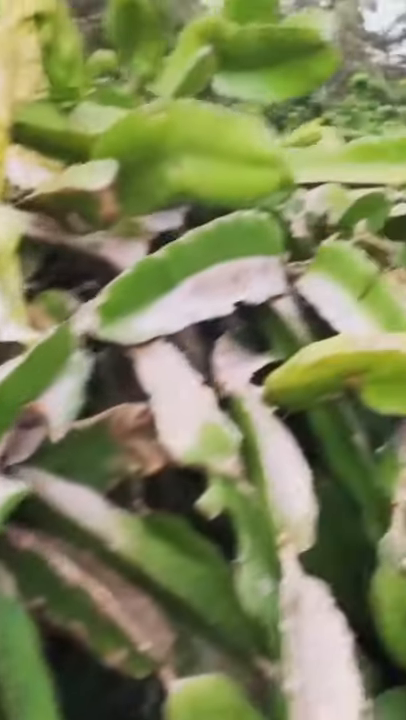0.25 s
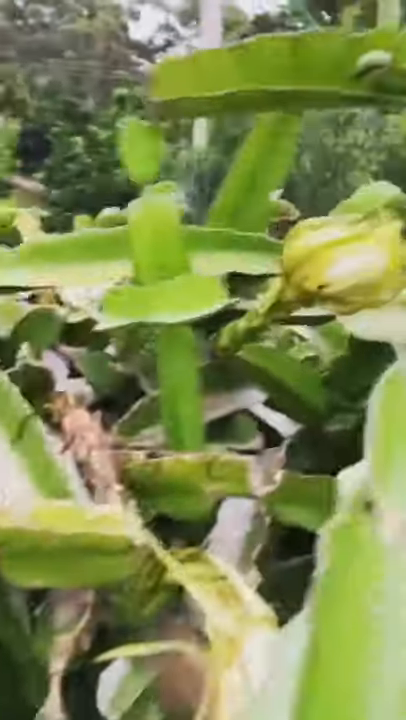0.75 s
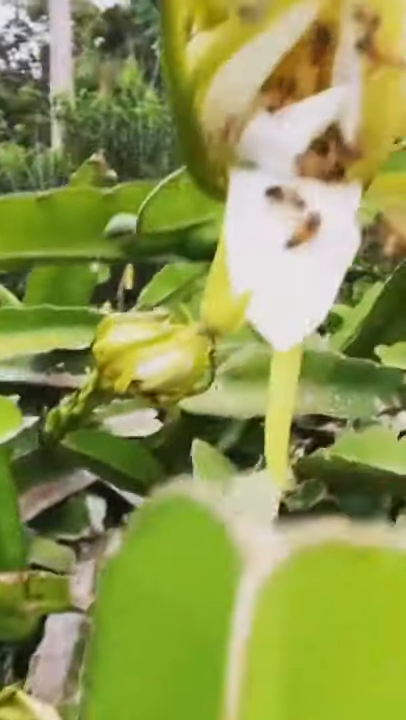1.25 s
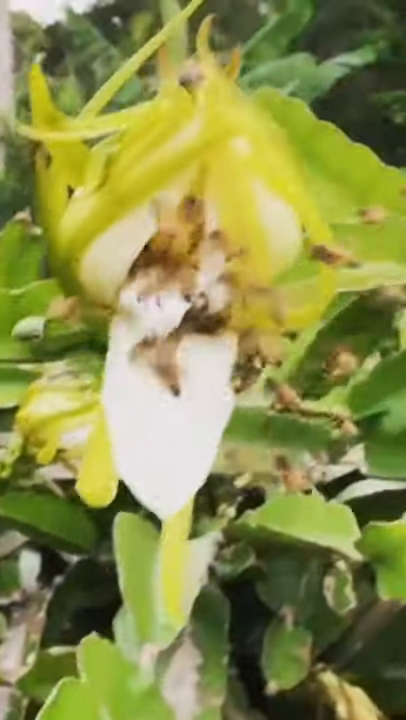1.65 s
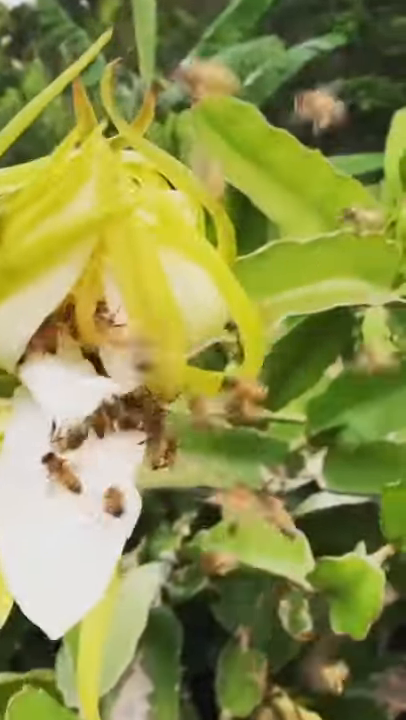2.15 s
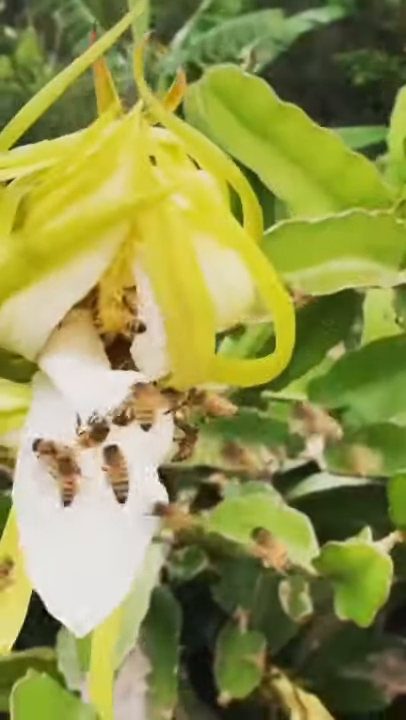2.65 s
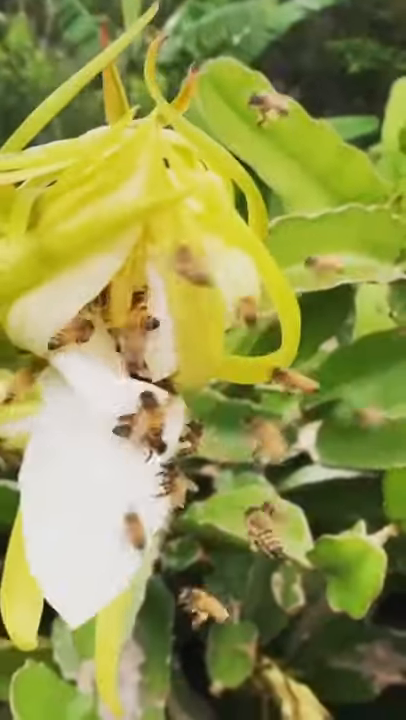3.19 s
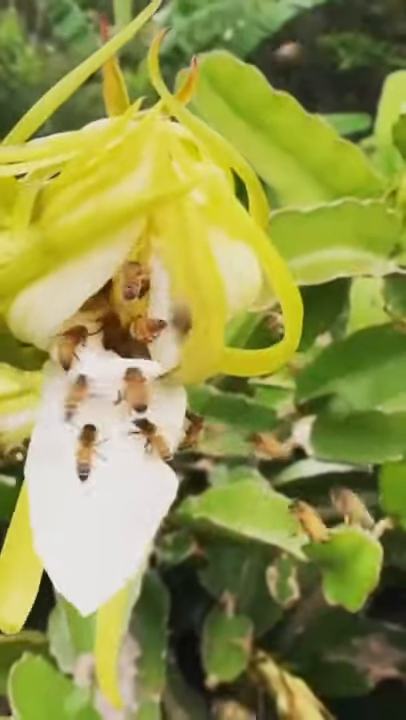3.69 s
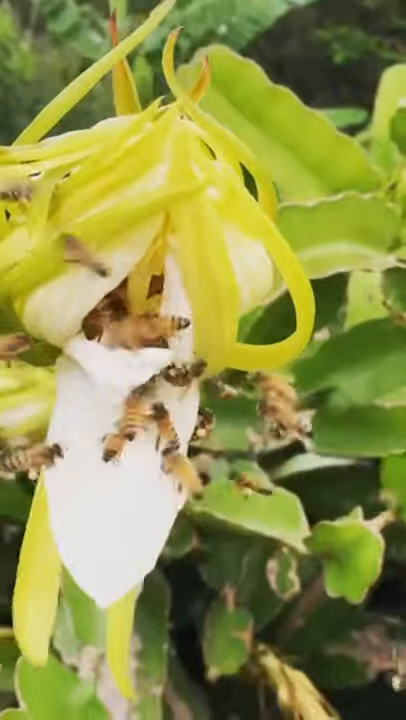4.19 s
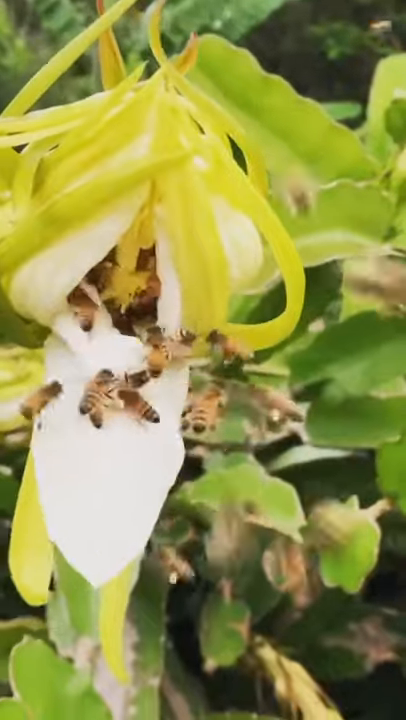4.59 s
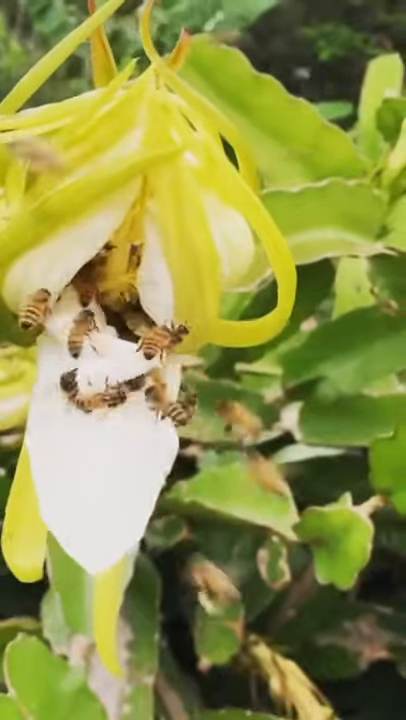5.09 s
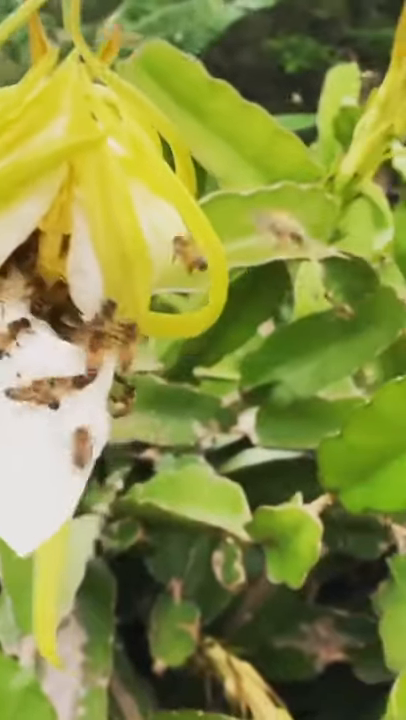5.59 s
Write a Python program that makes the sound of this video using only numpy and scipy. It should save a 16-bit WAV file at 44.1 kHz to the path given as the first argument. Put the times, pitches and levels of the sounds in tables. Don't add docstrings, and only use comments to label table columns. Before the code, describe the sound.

A close, hand-held stereo recording of honey bees around a flower outdoors. It opens with airy hiss, a thin high shimmer of far insects, light wind rumble and a low moan in the first half second. A wavering hum of many wingbeats, around 250 hertz with buzzy overtones, runs throughout. Very close bees swell past at about 0.45, 0.6 and 0.75 s, with soft thumps near 0.37 and a hard low knock at 0.5, then a light tap at 0.84. Another strong pass and quick tick come at 1.6 s; the hiss abruptly dips. At 2.15 s a loud buzz arrives with a short knock and long thud. The background stays partly muffled until about 3.3 s. Moderate passes follow at 3.0 and 3.5 s, then smaller ones. A very faint distant machine whine lingers. The ending is gentler, with a short low wind moan near 5.7 s.

```python
import sys
import numpy as np
from scipy import signal
from scipy.fft import rfft, irfft
from scipy.io import wavfile
from scipy.ndimage import uniform_filter1d

SR = 44100
rng = np.random.default_rng(int(sys.argv[2]) if len(sys.argv) > 2 else 0)


def rack_gain(trim_db):
    fader = np.asarray(trim_db, float)
    return 10 ** (fader / 20)


def wav_out(sig):
    wavfile.write(sys.argv[1], SR, np.round(np.clip(np.atleast_2d(sig).T, -1, 1) * 32767).astype(np.int16))


N = 257544


def evened(x):
    return x / np.sqrt(np.mean(x ** 2) + 1e-20)


def read(points, hz):
    f, value = np.transpose(points)
    return np.interp(np.log(hz + 1), np.log(f + 1), value)


def curves(rows, t):
    s, *columns = np.transpose(rows)
    return [np.interp(t, s, c) for c in columns]


def drift(t, top_hz, count=16):
    hz = np.geomspace(top_hz / 12, top_hz, count) * rng.uniform(.9, 1.1, count)
    coarse = t[::64]
    waves = np.sin(2 * np.pi * (hz[:, None] * coarse + rng.random((count, 1)))) / hz[:, None] ** 0.2925
    return np.interp(t, coarse, evened(waves.sum(0)))


def add(mix, s, sound):
    part = mix[round(s * SR):][:len(sound)]
    part += sound[:len(part)]


def wind_filter(t):
    # on/s, off/s, depth/dB, share felt in the middle band
    dips = [
        (-.1, 0.454, -7, 0.26),
        (1.594, 2.053, -24, 0.5),
        (2.047, 2.996, -13, 0.46),
        (3.038, 3.322, -15, 0.6),
        (5.493, 5.665, -4, 1.3),
    ]
    cut_s, hold_s, relax_s, let_go_s = 0.0057, 0.27, 1.2, 0.043
    on, off, depth_db, share = np.transpose(dips)[:, :, None]
    cut_in = 1 + np.tanh((t - on) / (cut_s * (20 / depth_db) ** 2))
    let_go = 1 - np.tanh((t - off) / let_go_s)
    relax = np.exp(-np.maximum(t - on - hold_s, 0) / relax_s)
    dip_db = depth_db * .25 * cut_in * let_go * relax
    return (share * dip_db).sum(0), dip_db.sum(0)


def wind():
    # t/s, level/dB
    gusts = [(0.0, -57), (0.16, -57), (0.37, -48.5), (0.55, -56), (0.78, -55), (1.61, -63), (2.08, -57),
             (2.26, -68), (2.85, -64.5), (3.3, -64.5), (3.42, -61.5), (3.99, -56), (4.38, -58),
             (5.07, -57.5), (5.5, -59.5), (5.84, -59)]
    # f/Hz, level per Hz/dB
    rumble_colour = [(20, -34), (40, -1), (62, 3.5), (100, -3.5), (160, -12.5), (260, -6.5), (500, -39.5)]
    t = np.arange(N) / SR
    colour = rack_gain(read(rumble_colour, np.fft.rfftfreq(N, 1 / SR)))
    rumble, differ = irfft(rfft(rng.standard_normal((2, N))) * colour, N)
    ports = rumble + rack_gain(-20.5) * differ * np.array([[1], [-1]])
    lumpy = ports * rack_gain(1.9 * drift(t, 8.9))
    return evened(lumpy) * rack_gain(curves(gusts, t)[0] + 4.5)


def swarm():
    # t/s, level/dB, second harmonic over first/dB, brightness/dB
    crowd = [(0.0, -55, 2, 3), (0.25, -47, -2.5, -1.5), (0.53, -47.5, 1, -1), (0.78, -45, -1.5, 0),
             (0.96, -54.5, 3, -3), (1.25, -51.5, 0, 2.5), (1.72, -57.5, 1.5, -4.5), (2.0, -47.5, -6, 5),
             (2.39, -58, 2, -3.5), (2.67, -54, 1.5, -2), (2.9, -58, -2, 2.5), (3.25, -57, 0.5, 2.5),
             (3.6, -46, -1.5, -2.5), (4.0, -52.5, 5, -3), (4.4, -56.5, 6.5, -2.5), (4.7, -52.5, -3, -0.5),
             (5.05, -54, -4, -7), (5.6, -61, 0.5, -0.5)]
    # multiple of the wingbeat, level/dB
    overtones = [(3, 5.5), (4, 5.5), (5, 5.5), (6, 2), (7, -2), (8, -26), (9, -59)]
    bees, slow = 14, 4
    layers_db = (1, 2, 1.5)
    follows, dips = 0.54, 0.53
    t = np.arange(N // slow + 1) * slow / SR
    layers = np.zeros((3, 2, len(t)))
    for centre_hz in 253 + 11 * np.linspace(-1.5, 1.5, bees):
        hz = centre_hz * (1 + .016 * drift(t, 5) + 0.011 * drift(t, 50))
        turn = 2 * np.pi * np.cumsum(hz) * slow / SR
        near = rack_gain(3.92 * drift(t, 10))
        lag = 0.37 * (drift(t, 2) - .5) * np.array([[-.5], [.5]])
        layers[0] += near * np.cos(turn + .35 * lag)
        layers[1] += near * rack_gain(2.5 * drift(t, 9)) * np.cos(2 * turn + 1.8 * lag)
        for k, db in overtones:
            port_level = rack_gain(db + np.array([[-1.5], [1.5]]))
            layers[2] += near ** 1.29 * port_level * np.cos(k * (turn + lag) + rng.uniform(0, 6.54))
    level_db, facing_db, bright_db = curves(crowd, t)
    second_db = level_db + facing_db
    near_db = np.maximum(level_db, second_db)
    rest_db = near_db.mean()
    upper_db = bright_db + rest_db + follows * (near_db - rest_db) + dips * wind_filter(t)[0]
    mix = np.zeros((2, len(t)))
    for db, trim_db, layer in zip((level_db, second_db, upper_db), layers_db, layers):
        mix += rack_gain(db + trim_db) * evened(layer)
    return signal.resample_poly(mix, slow, 1, axis=1)[:, :N]


def air():
    # f/Hz, level per Hz/dB
    hiss_colour = [(100, -11), (380, 1), (1000, 1), (1900, 6), (2200, 0), (4000, 0), (5800, 2.5),
                   (7700, 3.5), (8100, 2), (10800, 0), (13300, 0.5), (14200, 1.5), (15500, -1)]
    # t/s, gain/dB
    hiss_gain = [(0, 1.5), (1.3, 0.5), (1.58, 4), (1.7, 2.5), (3.2, 1.5), (4.4, 0.5), (5.6, -2.5),
                 (5.84, 1.5)]
    # f/Hz, likeness of the ports (0-1)
    likeness = [(100, 0.79), (500, 1), (1100, 0.34), (2000, 1), (3200, 0.24), (4300, 0.78), (6000, 0.94),
                (15000, 0.91)]
    # f/Hz, right over left/dB
    right_over_left = [(400, -3.5), (800, 0.5), (2000, 2.5), (2800, 1.4), (4000, 0)]
    hiss_db = -44
    centre_hz, spread_hz, chorus_db = 6728, 434, 12.87
    switch_s, switch_length_s, switch_share = 1.592, 0.01, 0.52
    port_zero_hz, port_turn_hz = 2790, 4130

    frames, hz = N // 128 + 5, np.fft.rfftfreq(512, 1 / SR)
    t = np.arange(frames) * 128 / SR
    a, b, c, d, patches = rng.standard_normal((frames, 257, 5)).T
    patches = evened(uniform_filter1d(uniform_filter1d(patches, size=6, axis=0), size=24, axis=1))
    flicker = evened(uniform_filter1d(rng.standard_normal(frames), size=5))
    insects = rack_gain(chorus_db) * np.exp(-.5 * ((hz - centre_hz) / spread_hz) ** 2)
    colour = np.hypot(rack_gain(read(hiss_colour, hz)), insects)

    top = curves(hiss_gain, t)[0]
    middle, chorus = wind_filter(t)
    middle = middle + 2 + .5 * top
    chorus = chorus - 1 + .5 * top
    dip_hz = [300, 1900, 2150, 4200, 5600, 6400, 7100, 7850, 8050]
    dip_db = np.array([np.interp(hz, dip_hz, [1.0 * m, 0.93 * m, 1.51 * m, 0.76 * m, 0.47 * m,
                                              0.62 * k, 0.9 * k, 0.63 * k, p])
                       for m, k, p in zip(middle, chorus, top)]).T

    same = np.clip(read(likeness, hz), 0, 1)[:, None]
    snap = np.exp(-((t - switch_s) / switch_length_s) ** 2)
    same = same * (1 - switch_share * (hz < 7900)[:, None] * snap)
    turns = np.interp(hz, [885, 2180, 2650, 4486], [0.069, 0.33, 0.06, .48])
    turns = np.maximum((hz - port_zero_hz) / port_turn_hz, turns)
    left = a + 1j * b
    right = same * left * np.exp(-2j * np.pi * turns)[:, None] + np.sqrt(1 - same ** 2) * (c + 1j * d)
    z = np.array([left, right * rack_gain(read(right_over_left, hz))[:, None]]) * colour[:, None]
    rest = np.sqrt(np.mean(signal.istft(z[0], nperseg=512, noverlap=384)[1] ** 2))
    sway = drift(np.arange(N) / SR, 6)[np.minimum(np.arange(frames) * 128, N - 1)]
    z = z * rack_gain(dip_db + 0.58 * patches + 0.57 * flicker + 0.25 * (hz < 4500)[:, None] * sway)
    return rack_gain(hiss_db) / rest * signal.istft(z, nperseg=512, noverlap=384)[1][:, :N]


def whine():
    t = np.arange(N) / SR
    turn = 2 * np.pi * np.cumsum(1912 * (1 + 0.0042 * drift(t, 12))) / SR
    level = rack_gain(-63.5 + 3.7 * drift(t, 10) + 1.4 * wind_filter(t)[0])
    return level * np.array([1.5 * np.sin(turn + 0.47), 0.81 * np.sin(turn)])


def moans():
    # t/s, length/s, f/Hz, level/dB
    gap_tones = [
        (0.143, 0.31, 94.5, -49),
        (3.778, 0.26, 118, -55),
        (5.643, 0.12, 99, -52),
    ]
    out = np.zeros(N)
    for s, length, hz, db in gap_tones:
        t = np.arange(0, length, 1 / SR)
        turn = 2 * np.pi * np.cumsum(hz * (1 + 0.056 * drift(t, 14.6))) / SR
        add(out, s, np.sqrt(2) * rack_gain(db) * np.hanning(len(t)) ** 0.22 * np.sin(turn))
    return out


def passes():
    # nearest t/s, wingbeat level/dB, wingbeat f/Hz, approach/s, second harmonic over first/dB
    fly_bys = [(.345, -49, 269.4, .03, 5), (.446, -28, 254.4, .045, -2), (0.611, -32.5, 243, .09, -8.5),
               (.735, -35, 235, .05, -7.5), (.81, -55.5, 247, 0.038, 13), (0.944, -52, 260, 0.046, 9.5),
               (1.185, -43.5, 247.3, 0.028, -1.5), (1.58, -30.5, 255.2, 0.042, -3),
               (1.84, -57.5, 255, 0.031, 14), (2.136, -29, 246.5, 0.052, -9.5),
               (2.645, -50, 255, 0.038, -5), (3.006, -36, 260.8, 0.047, -6), (3.084, -44, 260.5, 0.026, -4),
               (3.465, -40.5, 256, .04, -5), (3.591, -43, 255.7, 0.065, -2), (3.71, -47.5, 259, 0.052, 1),
               (3.85, -53, 248, .06, 11), (4.154, -50, 253.2, 0.063, 6.5), (4.259, -52.5, 256.8, 0.029, 8),
               (4.441, -54.5, 249.4, 0.044, 6), (4.711, -49, 258.3, 0.041, -3),
               (4.995, -48, 258.2, 0.026, -1.5), (5.3, -54.5, 258, 0.055, 8), (5.76, -47.5, 250, .09, -7)]
    # multiple of the wingbeat, level against the third/dB
    overtones = [(3, 1), (4, -1.5), (5, 0.5), (6, -8), (7, -7.5), (8, -8)]
    fall_db, leave = 26, 0.55
    glide = 0.0418
    out = np.zeros((2, N))
    for s, near_db, near_hz, approach, second_db in fly_bys:
        t = np.arange(s - 3 * approach, s + 2.5 * approach, 1 / SR)
        away = (t - s) / approach / np.where(t > s, leave, 1)
        hz = near_hz * (1 - glide * np.tanh(away))
        beat_db = near_db - fall_db * np.log10(1 + away ** 2)
        turn = 2 * np.pi * np.cumsum(hz * (1 + 0.008 * drift(t, 60))) / SR
        lag = .16 * drift(t, 4) * np.array([[-1], [1]])
        upper = np.zeros((2, len(t)))
        for k, db in overtones:
            upper += rack_gain(db + 6.0 * drift(t, 12)) * np.cos(k * (turn + lag + 0.21 + 0.038 * drift(t, 80)))
        beam_db = second_db + 2 * np.tanh(away) + 2.1 * drift(t, 25)
        second = rack_gain(beam_db) * np.cos(2 * turn + lag + 0.42)
        third_level = rack_gain(-17 + .5 * second_db)
        wave = rack_gain(beat_db) * (np.cos(turn + .15 * lag) + second + third_level * upper)
        for port, sound in zip(out, wave):
            add(port, t[0], -np.sqrt(2) * sound * signal.windows.tukey(len(t), .3))
    return out


def bumps():
    # t/s, peak level/dB, start f/Hz, end f/Hz, t60/s
    blows = [
        (0.357, -33, 120, 59.6, 0.13),
        (0.387, -33, 111, 55, 0.13),
        (0.4955, -19.5, 179, 70, 0.073),
        (.835, -37.5, 170, 62, 0.088),
        (1.611, -31.5, 333, 69.6, 0.056),
        (1.781, -54, 100, 55, 0.073),
        (2.15, -24, 156, 69.5, 0.024),
        (2.162, -30, 109, 46.5, 0.15),
        (2.208, -45, 100, 55.4, 0.14),
    ]
    puff_db, puff_hz, puff_longer = -10, 153, 1.6
    out, t = np.zeros(N), np.arange(SR // 4) / SR
    b, a = signal.butter(2, [30, puff_hz], "band", fs=SR)
    for s, db, start_hz, end_hz, t60 in blows:
        hz = end_hz + (start_hz - end_hz) * np.exp(-t / 0.0047)
        swing = np.sin(2 * np.pi * np.cumsum(hz) / SR)
        puff = evened(signal.lfilter(b, a, rng.standard_normal(len(t))))
        blow = rack_gain(-60 * t / t60) * swing + rack_gain(puff_db - 7 - 60 * t / (t60 * puff_longer)) * puff
        add(out, s, rack_gain(db + 3) * (1 - np.exp(-t / 0.0018)) * blow)
    return out


def scene():
    return wind() + swarm() + air() + whine() + moans() + passes() + bumps()


def thin_stereo(x):
    bands = [0, 28, *range(40, 96, 8),
             96, 108, 120, 132, 144, 160, 176, 196, 216, 240, 264, 292, *range(320, 737, 32)]
    # f/Hz, level under its partner where mid or side is dropped/dB
    drop_under = [(300, 27), (2000, 18), (3500, 8), (4300, 5.5), (5200, 7), (15000, 7)]
    # from t/s, to t/s, up to f/Hz
    mono_spans = [(0, .11, 720), (.23, .87, 660), (1.56, 1.71, 260), (1.99, 2.25, 680), (2.36, 2.39, 600),
                  (2.45, 2.69, 700), (2.92, 3.03, 720), (3.09, 3.24, 720), (3.35, 3.64, 680),
                  (3.71, 4.18, 640), (4.68, 4.72, 350), (5.09, 5.16, 200)]
    frame_offset, last_line = 656, 723
    ragged_hz = 40
    quiet_db = [-91.3, -93.5]
    pad = 1024 - frame_offset
    pair = np.pad([x[0] + x[1], x[0] - x[1]], ((0, 0), (pad, 2048))) / 2
    window = np.sin(np.pi * (np.arange(2048) + .5) / 2048)
    shape = dict(window=window, nperseg=2048, noverlap=1024)
    hz, t, z = signal.stft(pair, SR, **shape)
    s, edge_hz = t - pad / SR, ragged_hz * rng.standard_normal(len(t))
    for start, end, top_hz in mono_spans:
        z[1][(hz[:, None] < top_hz + edge_hz) & (s > start - .015) & (s < end + .015)] = 0
    start, end, top_hz, share = 1.7, 3.4, 900, .45
    chance = rng.random((len(t), 16)).T[np.minimum(np.arange(len(hz)) // 4, 15)]
    z[1][(chance < share) & (hz[:, None] < top_hz) & (s > start) & (s < end)] = 0
    power = uniform_filter1d(uniform_filter1d(abs(z) ** 2, size=6, axis=1), size=2, axis=2)
    faint = power < rack_gain(quiet_db)[:, None, None] ** 2
    z[faint & (hz > 2000)[:, None]] = 0
    z[:, last_line:] = 0
    for lo, hi in zip(bands, bands[1:]):
        size = np.sqrt((abs(z[:, lo:hi]) ** 2).sum(1))
        margin = rack_gain(read(drop_under, (lo + hi) * SR / 4096))
        z[:, lo:hi] *= (size * margin > size[::-1])[:, None]
    mid, side = signal.istft(z, **shape)[1][:, pad:pad + N]
    return np.array([mid + side, mid - side])


def band_limit(x):
    return signal.sosfilt(signal.butter(12, 16830, fs=SR, output="sos"), x)


def record(dry):
    limited = .17 * np.tanh(dry / .17)
    return band_limit(thin_stereo(limited))


dry = scene()
out = record(dry)
wav_out(out)
```